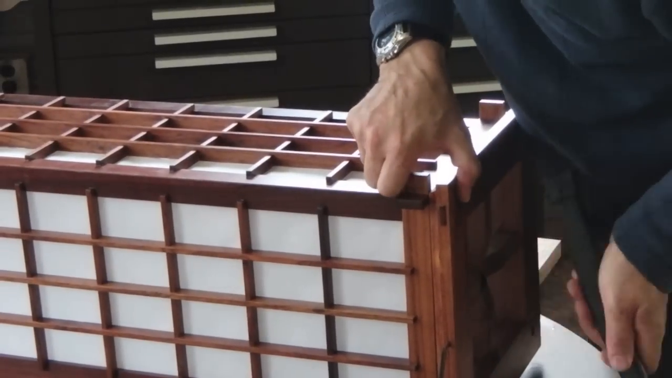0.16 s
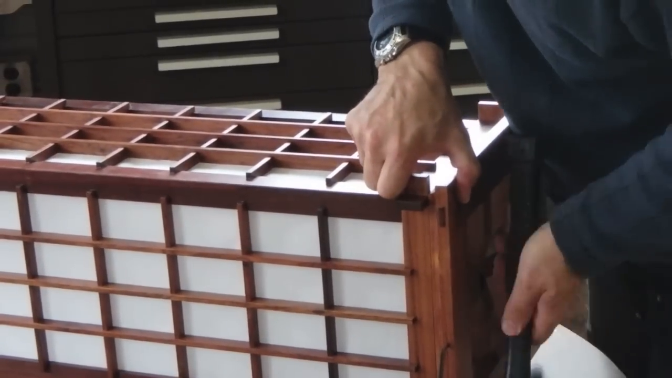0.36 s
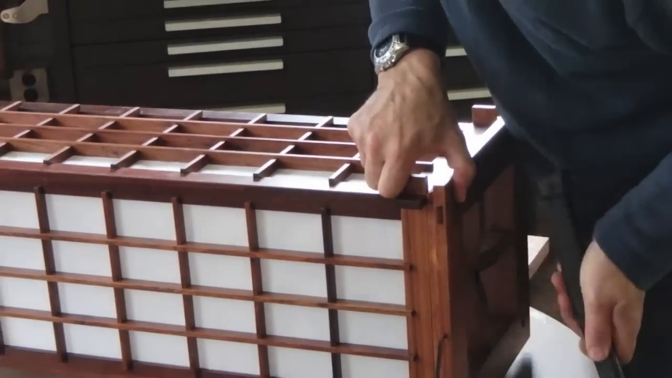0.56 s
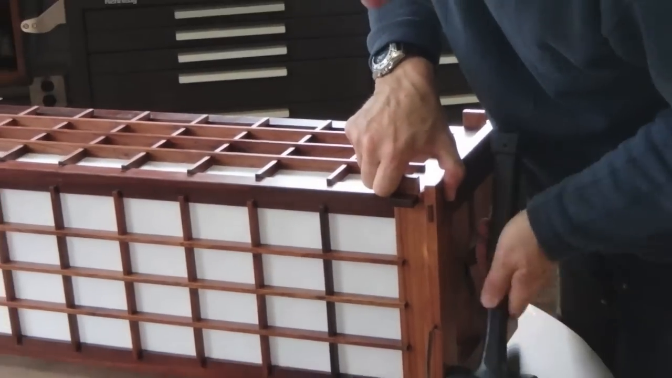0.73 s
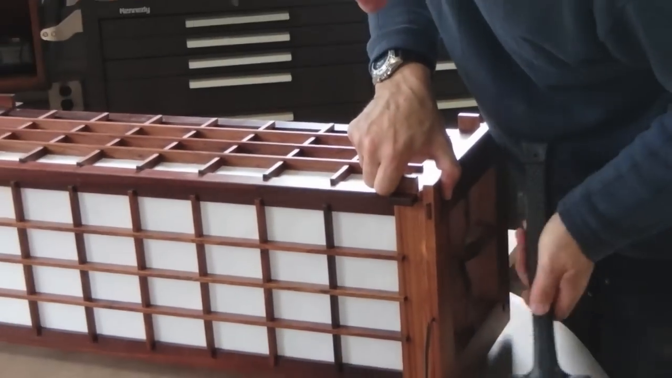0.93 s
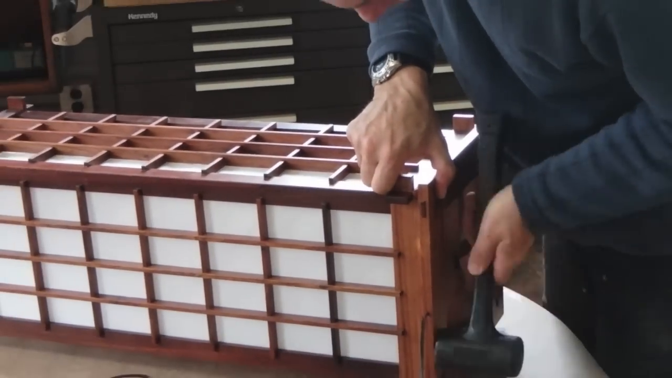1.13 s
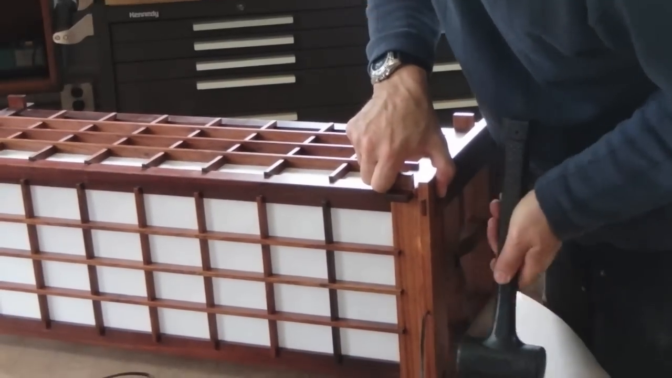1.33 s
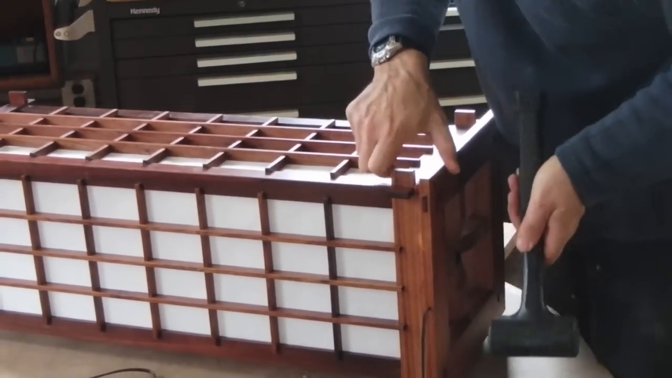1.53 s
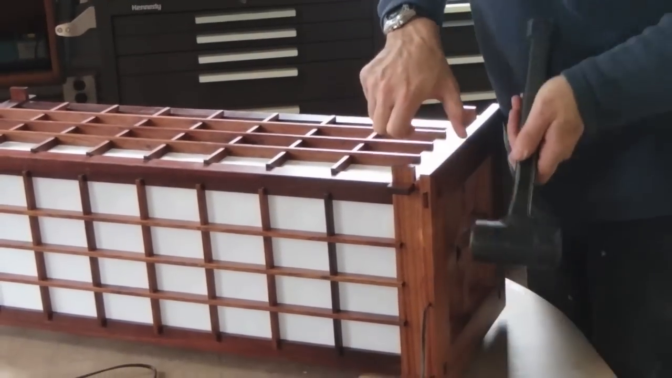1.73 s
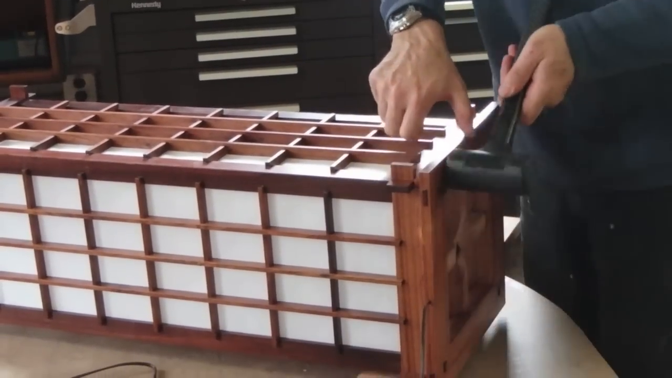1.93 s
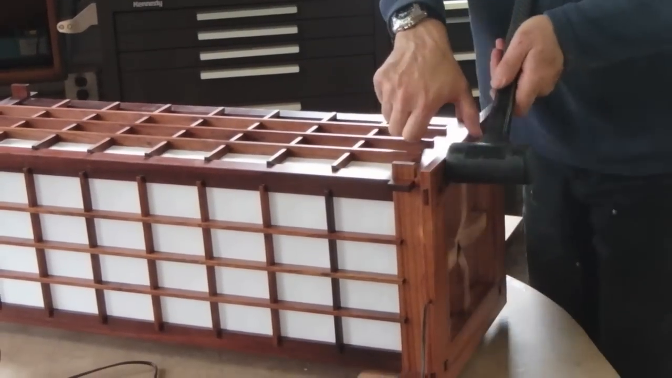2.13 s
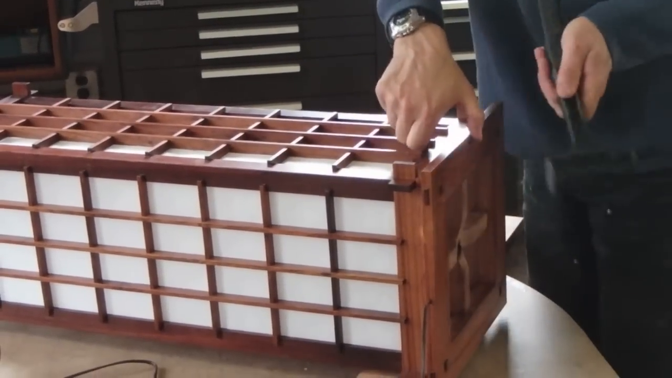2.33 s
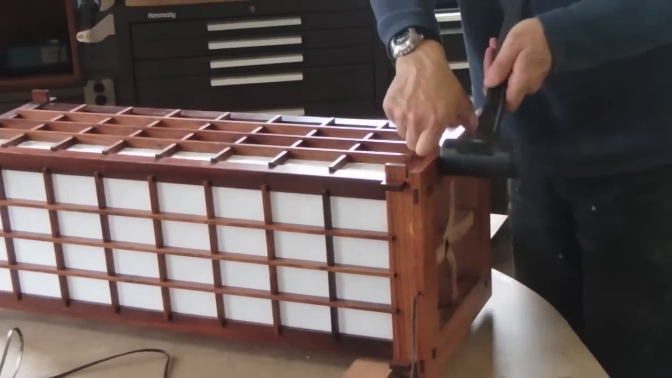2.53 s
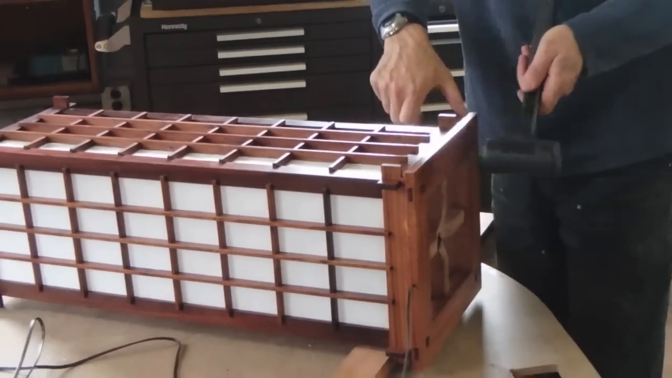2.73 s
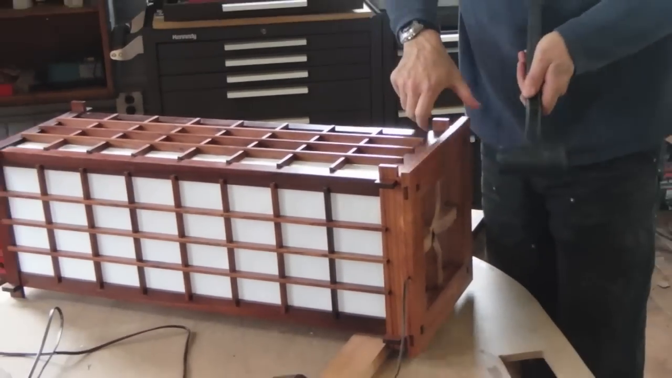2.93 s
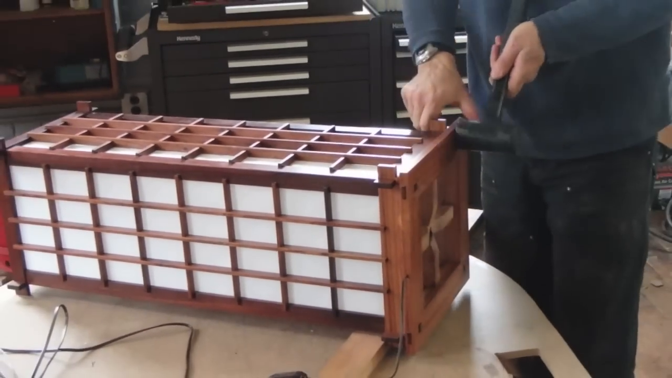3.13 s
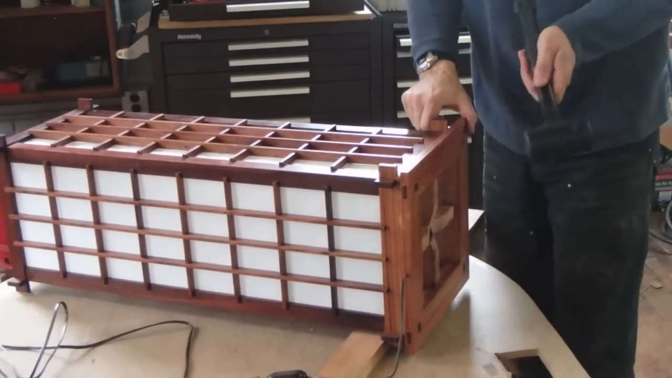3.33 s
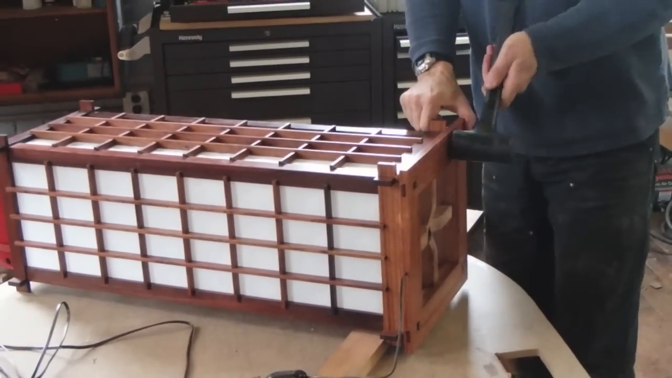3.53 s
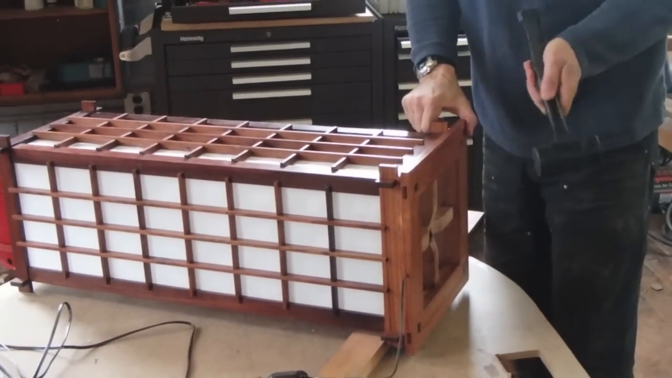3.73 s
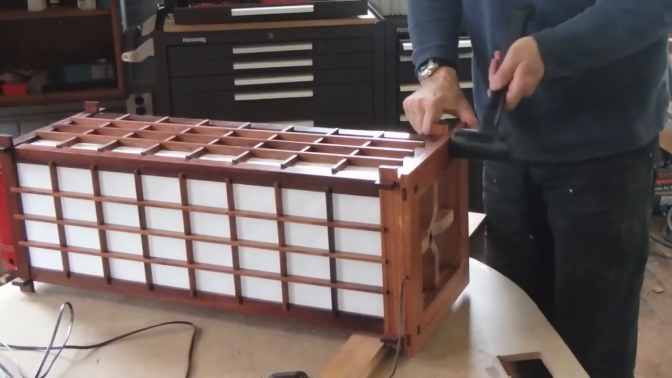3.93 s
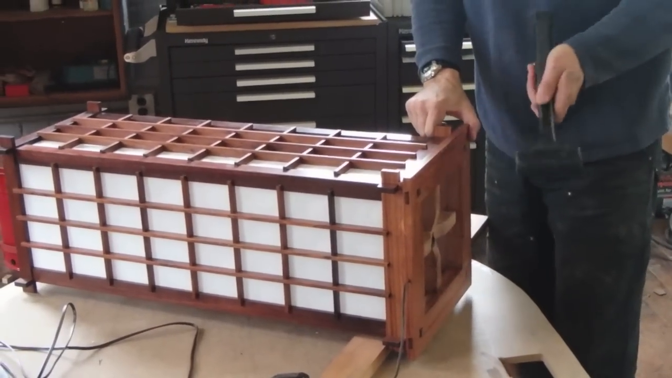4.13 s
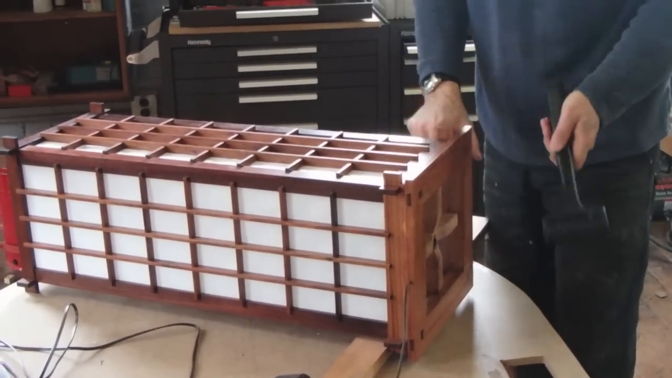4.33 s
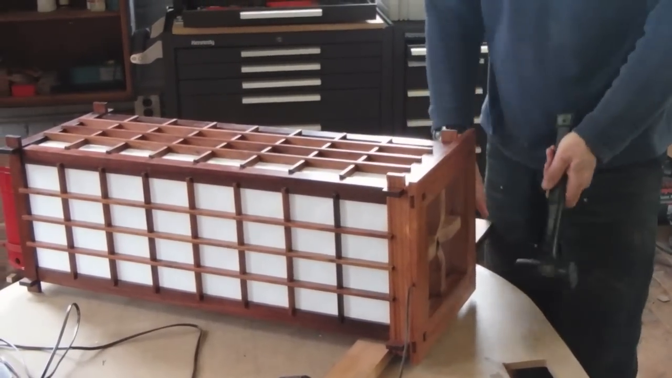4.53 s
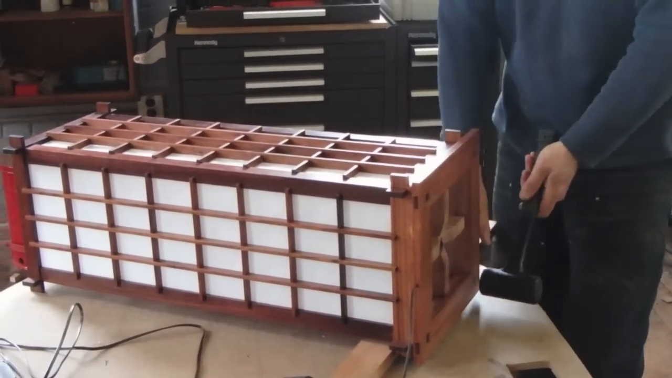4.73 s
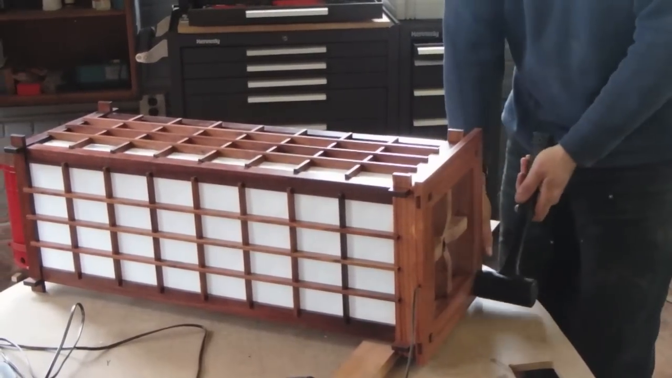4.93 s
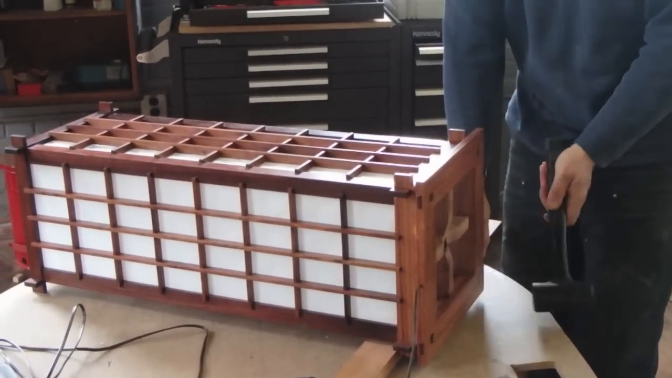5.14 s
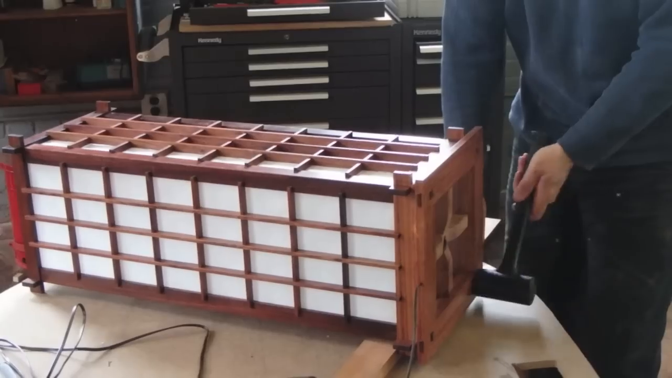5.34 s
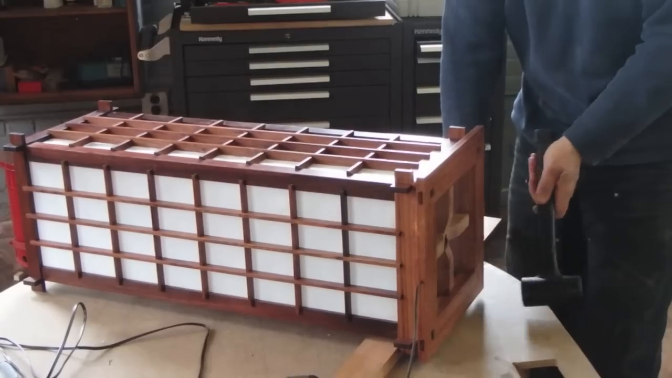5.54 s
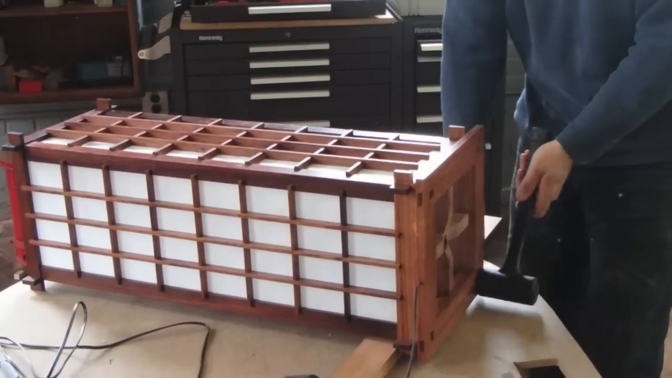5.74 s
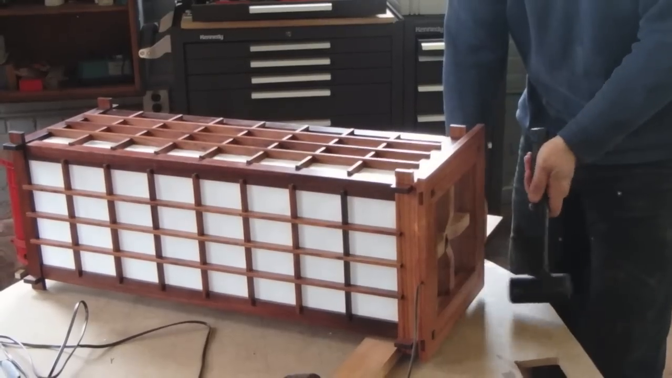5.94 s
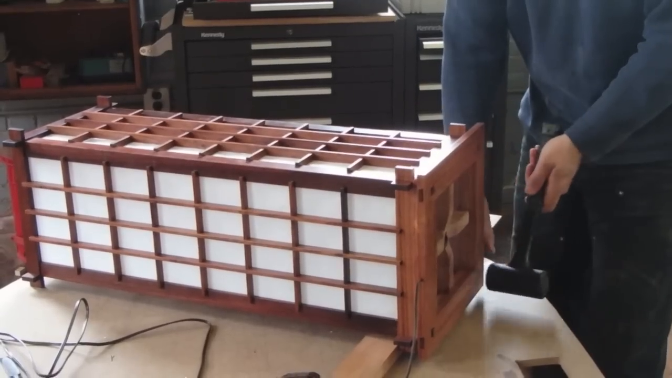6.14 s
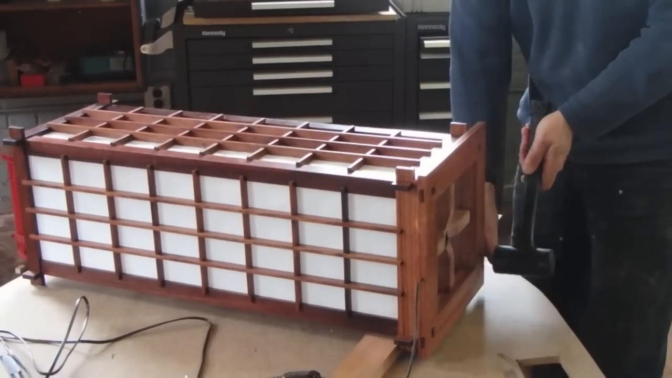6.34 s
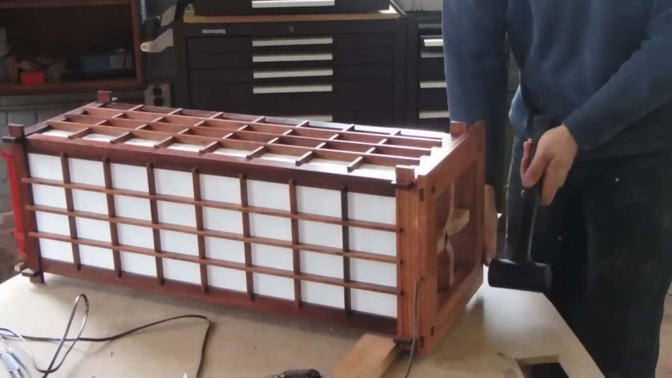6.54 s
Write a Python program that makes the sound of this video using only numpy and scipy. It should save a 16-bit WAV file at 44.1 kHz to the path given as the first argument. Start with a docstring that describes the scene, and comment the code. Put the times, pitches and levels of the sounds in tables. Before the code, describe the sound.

A low, rumbling workshop tone with light hiss opens, and a small bump comes at 0.2 s. A shot-filled mallet then hits a wooden lattice frame at 0.6, 0.95 and 1.35 s: hard, clipped cracks with short rail ring, bench thud and lively room tail, each preceded by a tiny gritty swish. The level flutters briefly around 1.2 s. Hiss and room tone creep up; a hand brushes wood at 2.2-2.3 s among light bumps until 2.5. One blow lands at 2.7, small taps and another brief flutter at 3.2-3.3, then brighter blows at 3.7 and 4.1. A faint low drone passes from 4.6 to 5.5 s, with a light tap at 5.1. Three final, weightier knocks fall at 5.5, 5.9 and 6.2 s, the tail fading to 6.55. The close camera microphone is brighter on the left.

```python
"""Mallet on a wooden lattice

A shot-filled mallet knocks the joints of a wooden lattice frame home on a workbench in a hard-walled shop.
Each blow cracks, rings the rails briefly and thuds the bench top; a burst of shot noise swishes before it.
Light bumps, two hand brushes, a low shop tone and one passing drone lie between the blows.
A small two-port camera overloads on the cracks, ducks its gain after each and lets its hiss creep back."""
import sys
import numpy as np
from scipy import signal
from scipy.fft import rfft, irfft, next_fast_len
from scipy.io import wavfile
from scipy.ndimage import uniform_filter1d, minimum_filter1d

SR = 44100
rng = np.random.default_rng(int(sys.argv[2]) if len(sys.argv) > 2 else 0)


def invert_db(level):
    """Linear amplitude ratio for a level in decibels (20 dB per decade), elementwise."""
    return 10 ** (np.asarray(level, dtype=float) / 20)


def output_pcm(signal):
    """Save a mono or channel-first signal as 16-bit PCM at the path in sys.argv[1].

    Samples are clipped to [-1, 1] before scaling.
    """
    pcm = np.clip(np.atleast_2d(signal).T, -1, 1) * 32767
    wavfile.write(sys.argv[1], SR, np.round(pcm).astype(np.int16))


N = 289718
GRID_HZ = np.fft.rfftfreq(8192, 1 / SR)


def unit(x):
    """Scale to rms 1."""
    return x / np.sqrt(np.mean(x ** 2) + 1e-20)


def along(hz, at_hz, values):
    """Read values on a log-frequency axis."""
    return np.interp(np.log(hz + 1), np.log(np.add(at_hz, 1)), values)


def filtered(x, response):
    """x times a complex response of frequency."""
    size = next_fast_len(x.shape[-1] + 8192)
    spectrum = rfft(x, size) * response(np.fft.rfftfreq(size, 1 / SR))
    return irfft(spectrum, size)[..., :x.shape[-1]]


def causal(gain):
    """Spectrum of the minimum-phase response with this gain on GRID_HZ, by folding the cepstrum."""
    cepstrum = irfft(np.log(gain + 1e-6))
    cepstrum[..., 1:4096] *= 2
    cepstrum[..., 4097:] = 0
    return np.exp(rfft(cepstrum))


def coloured(x, spectrum):
    """x through a minimum-phase filter with this spectrum."""
    pulse = irfft(causal(invert_db(along(GRID_HZ, *np.transpose(spectrum)))))
    return signal.fftconvolve(x, pulse[None, :4096], axes=1)[:, :N]


# left-right likeness of shop sound: pitch_hz, correlation
LIKENESS = [(60, .92), (290, 1), (1000, .96), (2000, .9), (3500, .8), (5000, .5), (9000, .3)]


def paired(two, spectrum):
    """Two unrelated signals blended to the shop's left-right likeness, then coloured."""
    def mid_side(hz):
        turn_rad = np.arccos(np.clip(along(hz, *np.transpose(LIKENESS)), -1, 1)) / 2
        return invert_db(along(hz, *np.transpose(spectrum))) * [np.cos(turn_rad), np.sin(turn_rad)]

    mid, side = filtered(two, mid_side)
    return np.array([mid + side, mid - side])


# shop tone, relative spectrum: pitch_hz, level_db
AIR = [(25, -27), (45, 6.5), (130, 4), (250, -6.5), (420, -9.5), (900, -19.5), (2500, -16), (3500, -19.5),
       (6000, -18), (12000, -38)]
# shop tone over time: time_s, level_db
AIR_LEVEL = [(0, -61), (2, -60.5), (4.4, -58), (4.75, -60), (6.57, -63.5)]
# drone, relative spectrum: pitch_hz, level_db
DRONE = [(190, -36.5), (235, -6.5), (265, -12.5), (300, -68)]
# drone over time: time_s, level_db
DRONE_LEVEL = [(4.55, -100), (4.65, -65.5), (5.4, -65), (5.55, -100)]


def air():
    """Shaped noise: the low, slightly unsteady tone of the shop and a faint passing drone."""
    t = np.arange(N) / SR
    waver_db = 1.3 * unit(uniform_filter1d(rng.standard_normal(N), size=4000))
    tone_gain = invert_db(np.interp(t, *np.transpose(AIR_LEVEL)) + waver_db)
    tone = tone_gain * unit(paired(rng.standard_normal((2, N)), AIR))
    narrow = [(20, -120), *DRONE, (2000, -120)]
    drone_gain = invert_db(np.interp(t, *np.transpose(DRONE_LEVEL)))
    return tone + drone_gain * unit(paired(rng.standard_normal((2, N)), narrow))


def jostle(length_s, rate_hz=400):
    """First contact, then small random re-contacts that fall about 9 dB per length_s."""
    draw = rng.random((96, 2))
    t = np.cumsum(-np.log(draw[:, 0] + 1e-9) / rate_hz) * (np.arange(96) > 0)
    size = 0.44 * (2 * draw[:, 1] - 1) * invert_db(-9 * t / (abs(length_s) + 1e-5))
    size[0] = 1
    return np.bincount(np.round(t * SR).astype(int), size)[:SR // 4]


# rails of the frame: pitch_hz, t60_s, struck_low_db, struck_top_db
RAILS = [(217, 0.39, -12, -25), (640, 0.026, -24.5, -12), (867, .04, -16.5, -4), (1390, 0.0074, -12.5, -10),
         (1538, 0.075, -6.5, -6.5), (1656, 0.027, -13.5, 5), (1880, 0.043, -5.5, -5),
         (2080, 0.0076, -15, -19), (2668, 0.0038, -10, 1), (3653, 0.007, -17.5, -3),
         (5620, 0.054, -15.5, -12), (6800, 0.0085, -22.5, -12.5)]
SMEAR_LOW_T60_S, SMEAR_TOP_T60_S = 0.018, 0.02


def crack(contacts, contact_ms, height, click_db=-13):
    """Each push, duller when softer, gives a broad click and rings the rails; peak 1."""
    hz, t60_s, low_db, top_db = np.transpose(RAILS)[:, :, None]
    level_db = low_db + height * (top_db - low_db) + 1.5 * rng.standard_normal(hz.shape)
    pitch_hz = hz * (1 + 0.02 * rng.standard_normal(hz.shape))
    half_width_hz = np.log(1000) / (2 * np.pi * t60_s)
    rails = invert_db(level_db) ** 2 / (1 + ((GRID_HZ - pitch_hz) / half_width_hz) ** 2)
    power = invert_db(click_db) ** 2 + rails.sum(0)
    softness = 1 + (2 * np.pi * GRID_HZ * contact_ms / 1000) ** 2

    # the shock runs through the lattice and leaves it smeared over milliseconds, colour unchanged
    smear_t60_s = SMEAR_LOW_T60_S + height * (SMEAR_TOP_T60_S - SMEAR_LOW_T60_S)
    run = rfft(rng.standard_normal(8192) * invert_db(-60 * np.arange(8192) / SR / smear_t60_s))
    smear = run / causal(np.abs(run))
    pulse = irfft(smear * causal(np.sqrt(power) / softness))[:4096]
    out = signal.fftconvolve(pulse, contacts)
    return out / np.abs(out).max()


# bench top: pitch_hz, level_db, t60_s, swell_s
BENCH = [(56, -17, 0.25, 0.0034), (96.1, -16.5, 0.59, 0.039), (131.6, -2, 0.3, 0.02),
         (145.4, -9, 0.15, 0.0033), (210.7, -10, 0.17, 0.014), (238.5, -7, 0.079, 0.011),
         (295.8, -6, 0.1, 0.022), (382, -4, 0.07, 0.013), (482, -12.5, 0.065, 0.0042),
         (566, -12, .05, 0.0082), (750, -16.5, .04, 0.007)]


def thud(contacts):
    """Bench modes swell and boom at slightly varied pitch and level; peak 1."""
    t = np.arange(SR // 2) / SR
    hz, db, t60_s, swell_s = np.transpose(BENCH)[:, :, None]
    pitch_hz = hz * (1 + 0.015 * rng.standard_normal(hz.shape))
    level_db = db + 1.5 * rng.standard_normal(hz.shape)
    envelope = invert_db(level_db - 60 * t / t60_s) * (1 - np.exp(-t / swell_s))
    boom = (envelope * np.sin(2 * np.pi * pitch_hz * t)).sum(0)
    out = signal.fftconvolve(boom, np.abs(contacts))[:len(t)]
    return out / np.abs(out).max()


# shop reverberation: pitch_hz, t60_s
SHOP = [(100, 0.91), (260, 0.9), (700, 0.59), (1840, 0.73), (4850, 0.57), (8000, 0.48), (12800, 0.64)]
# early echoes: delay_s, level_db
WALLS = [(.0035, -12), (.012, -12), (.019, -15), (.034, -18)]
SCATTER_T60_S = 0.015  # cluttered walls spread each echo


def shop(x, tail_db=-3):
    """Direct sound, early walls, and a fresh diffuse tail that dies band by band."""
    hz, t, z = signal.stft(rng.standard_normal((2, SR)), SR, nperseg=256)
    decay = invert_db(-60 * t / along(hz, *np.transpose(SHOP))[:, None])
    tail = signal.istft(z * decay, SR, nperseg=256)[1][:, :SR]
    onset = 1 - np.exp(-np.arange(SR) / SR / 0.0009)
    tail = paired(tail, [(30, 3.0), (300, 4.0), (16000, 6.0)]) * onset
    answer = invert_db(tail_db) * tail / np.linalg.norm(tail[0])
    answer[:, 0] += 1
    for delay_s, level_db in WALLS:
        spread = rng.standard_normal(512) * invert_db(-60 * np.arange(512) / SR / SCATTER_T60_S)
        answer[:, round(delay_s * SR):][:, :512] += invert_db(level_db) * spread / np.linalg.norm(spread)
    return signal.fftconvolve(x[None], answer, axes=1)[:, :SR]


# mallet blows: start_s, crack_db, thud_db, contact_ms, height (0 low - 1 top)
BLOWS = [(0.564, 5, -28, 0.029, 0.33), (0.9593, 4, -14.5, 0.019, 0.05), (1.3378, 3, -24, .033, 0.39),
         (2.7256, 1, -24.5, 0.036, 0.65), (3.726, -1.5, -26.5, 0.022, 0.97), (4.12, 3, -29, .015, 0.15),
         (5.5242, 12, -15, 0.038, 0.046), (5.877, 5, -20.5, 0.031, 0.32), (6.21, 3.5, -18, 0.054, 0.0405)]
# light taps and handling bumps: start_s, crack_db, thud_db, contact_ms, jostle_s
BUMPS = [(0.171, -27.5, -26, 0.034, 0.052), (2.208, -26.5, -33, 0.012, 0.041),
         (2.465, -42.5, -35.5, 0.44, .12), (3.315, -37.5, -43, 0.064, .003),
         (3.324, -27.5, -29, 0.049, 0.062), (3.925, -62.5, -33, 0.41, 0.079),
         (5.097, -26, -31, 0.069, 0.021)]
REBOUND_S, BUMP_HEIGHT = 0.0033, 0.13


def mallet():
    """Every blow or bump cracks the frame, heard in the shop, and thuds the bench."""
    out = np.zeros((2, N + SR))
    knocks = [(*row, REBOUND_S) for row in BLOWS]
    knocks += [(*row[:4], BUMP_HEIGHT, row[4]) for row in BUMPS]
    for start_s, crack_db, thud_db, contact_ms, height, jostle_s in knocks:
        at = round(start_s * SR)
        contacts = jostle(jostle_s)
        snap = crack(contacts, contact_ms, np.clip(height, 0, 1))
        out[:, at:at + SR] += shop(invert_db(crack_db) * snap)
        out[:, at:at + SR // 2] += invert_db(thud_db) * thud(contacts)
    return out[:, :N]


# sliding shot, relative spectrum: pitch_hz, level_db
SHOT = [(600, -45), (1500, -24.5), (2500, -8), (3600, -4.5), (5500, -16.5), (8000, -5), (10500, -21.5),
        (13000, -32)]
# a hand brushing the frame: centre_s, length_s, level_db
BRUSH = [(2.169, 0.066, -61.5), (2.279, .13, -53.5)]
SWING_LEAD_S, SWING_LENGTH_S, SWING_DB, SWING_TILT_DB_PER_OCT = 0.071, 0.019, -56, 14
BRUSH_TILT_DB_PER_OCT = -8


def swish():
    """Gritty noise in soft bursts: bright shot before each blow, duller skin on wood."""
    out = np.zeros((2, N + SR))
    t = np.arange(SR // 2) / SR - 0.25
    bursts = [(row[0] - SWING_LEAD_S, SWING_LENGTH_S, SWING_DB, SWING_TILT_DB_PER_OCT) for row in BLOWS]
    bursts += [(*row, BRUSH_TILT_DB_PER_OCT) for row in BRUSH]
    for centre_s, length_s, level_db, tilt_db in bursts:
        noise = rng.standard_normal((2, len(t)))
        grit_db = 1.7 * 20 / 20 * unit(uniform_filter1d(rng.standard_normal(len(t)), size=60))
        colour = [(hz, db + tilt_db * np.log2(hz / 3000)) for hz, db in SHOT]
        window = np.exp(-0.5 * (t / (length_s / 2)) ** 2)
        at = round((centre_s + t[0]) * SR)
        out[:, at:at + len(t)] += invert_db(level_db) * window * unit(paired(noise * invert_db(grit_db), colour))
    return out[:, :N]


def scene():
    """Blows, swishes and shop tone at the two ports."""
    return mallet() + swish() + air()


# camera hiss, relative spectrum: pitch_hz, level_db
HISS = [(100, 0.5), (3000, -19), (7000, -14.5), (12500, -12.5), (14200, -2), (14700, -62.5)]


def camera_hiss():
    """Independent shaped noise in each channel; rms 1."""
    noise = rng.standard_normal((2, N))
    return unit(filtered(noise, lambda hz: invert_db(along(hz, *np.transpose(HISS)))))


# port resonances: pitch_hz, level_db
PORTS = [(37.8, -5.5), (145, -3), (1000, 5.5), (1670, 1.5), (2270, 3.5), (2520, 4.5), (2760, 3.5),
         (3100, 3), (3492, 12.5), (4300, -1), (4700, 2.5), (5650, 2.5), (6200, -5.5), (6660, -1.5),
         (8250, -7), (8650, -4.5), (9500, -6.5), (11040, -7.5), (11600, -28.5), (14800, -22)]


def ports(x):
    """The ports' resonances colour both channels."""
    return coloured(x, PORTS)


def gain_control(x, target_db=9.0, start_db=13, top_db=22, hold_s=0.56, rise_db_per_s=13):
    """Gain drops fast to hold peaks at the target, waits, then climbs at a steady rate."""
    t, half_hold = np.arange(N) / SR, round(hold_s * SR / 2)
    need_db = np.minimum(target_db - 20 * np.log10(np.abs(x).max(0) + 1e-9), top_db)
    need_db = minimum_filter1d(need_db, size=2 * half_hold + 1, origin=half_hold, mode="nearest")
    need_db[0] = min(need_db[0], start_db)
    climb_db = rise_db_per_s * t
    gain_db = climb_db + np.minimum.accumulate(need_db - climb_db)
    keep = np.exp(-1 / (0.0004 * SR))  # smoothing time constant 0.4 ms
    return invert_db(start_db + signal.lfilter([1 - keep], [1, -keep], gain_db - start_db))


# spans where the level flickers and sags: start_s, end_s, depth_scale_db
FLICKER = [(1.183, 1.276, 13), (3.225, 3.296, 6)]


def flicker():
    """Gain that chops down in random steps every few milliseconds, ever deeper through each span."""
    t = np.arange(N) / SR
    chop = rng.random(2000)[np.floor(t * 220).astype(int)]  # 220 steps a second
    depth_db = np.zeros(N)
    for start_s, end_s, scale_db in FLICKER:
        deepening = 0.3 + (t - start_s) / (end_s - start_s)
        inside = (t > start_s) & (t < end_s)
        depth_db += scale_db * (0.067 + 4.2 * chop ** 2) * deepening * inside
    return invert_db(-uniform_filter1d(depth_db, size=30))


def overload(x):
    """Saturation with a firm knee, limit 1.12."""
    return x / (1 + np.abs(x / 1.12) ** 6) ** (1 / 6)


# right channel against left: pitch_hz, level_db, lag_rad
RIGHT = [(40, 1, 0), (500, 1.7, .15), (1500, 1, .55), (2100, .3, .9), (2650, -2, 1.1), (3150, -3.3, 1.55),
         (3700, -7, 1.4), (4300, -1, 1.8), (4900, -17, 1.8), (5650, -18, 1.05), (7500, -13.5, .7),
         (10000, -15.5, .1), (14000, -7, 0)]


def lopsided(x):
    """The right channel is duller and lags a little."""
    at_hz, level_db, lag_rad = np.transpose(RIGHT)
    response = invert_db(along(GRID_HZ, at_hz, level_db)) * np.exp(-1j * along(GRID_HZ, at_hz, lag_rad))
    pulse = np.roll(irfft(response), 16)[:4096]  # 16 samples of pre-ring, taken off below
    return np.array([x[0], signal.fftconvolve(x[1], pulse)[16:N + 16]])


# camera's top end: pitch_hz, level_db
BAND = [(12000, -3), (14200, -12.5), (15000, -14.5), (17000, -11), (20000, -30)]


def band_limit(x):
    """The camera's treble rolls off."""
    return coloured(x, BAND)


def low_pass(x):
    """Removes everything above the highest recorded frequency."""
    return signal.sosfilt(signal.butter(12, 16660, fs=SR, output="sos"), x)


def record(dry):
    """Ports, gain control, overload, hiss at the same gain, band limit."""
    hiss = camera_hiss()
    x = ports(dry)
    gain = gain_control(x) * flicker()
    x = lopsided(overload(gain * x)) + gain * invert_db(-64) * hiss
    mix = np.clip(band_limit(x), -1, 1)
    return low_pass(mix)


dry = scene()
out = record(dry)
output_pcm(out)
```